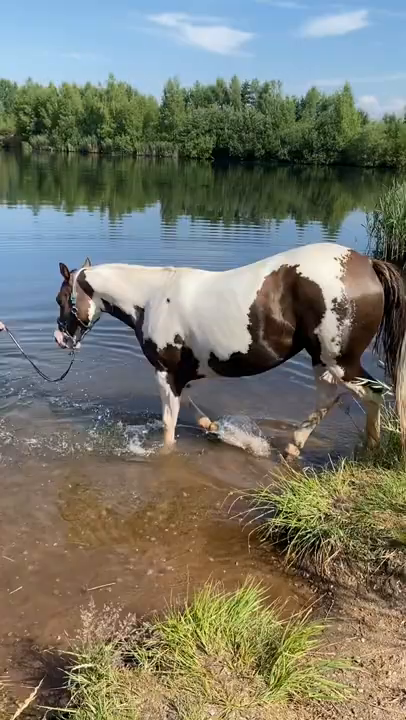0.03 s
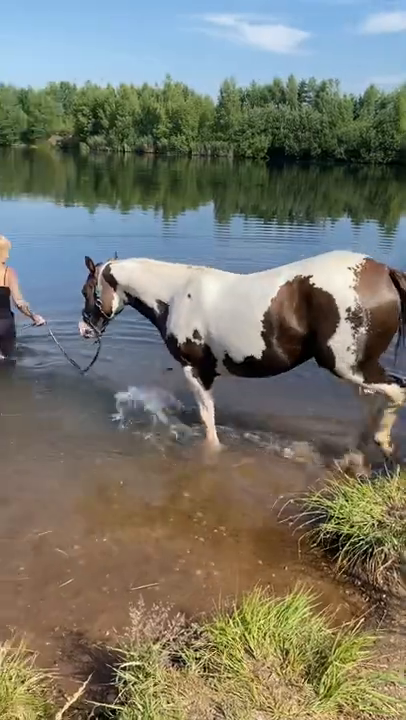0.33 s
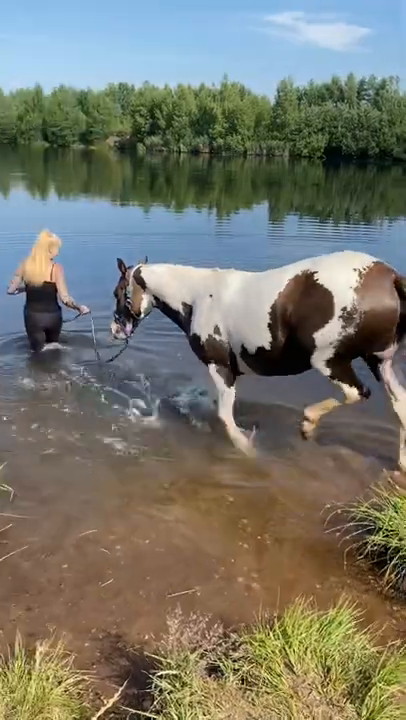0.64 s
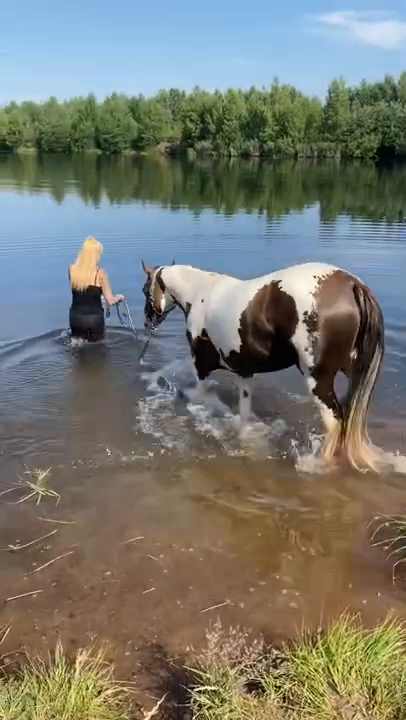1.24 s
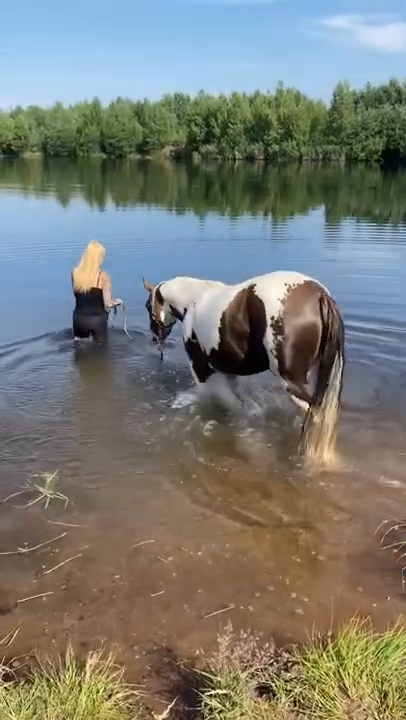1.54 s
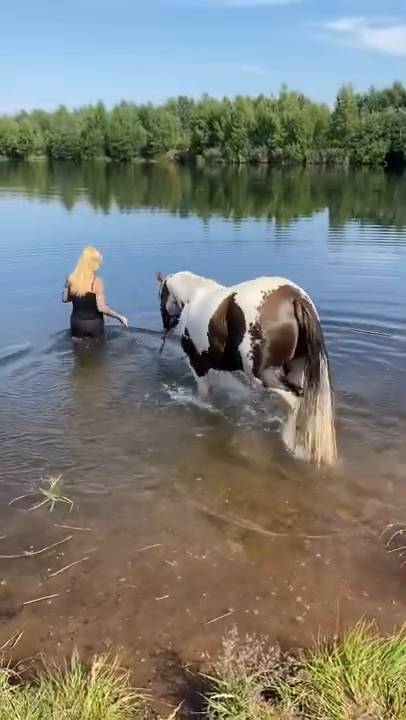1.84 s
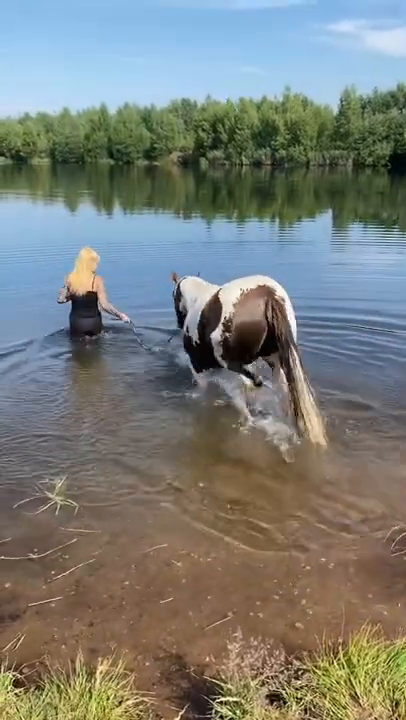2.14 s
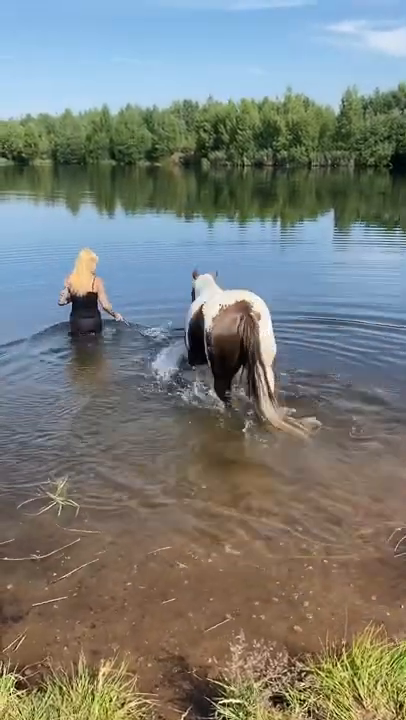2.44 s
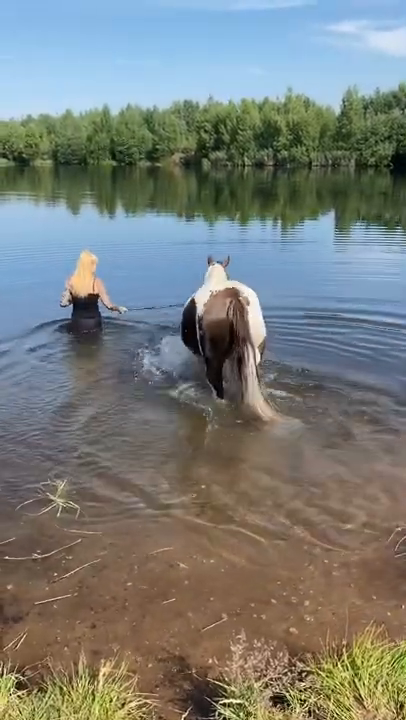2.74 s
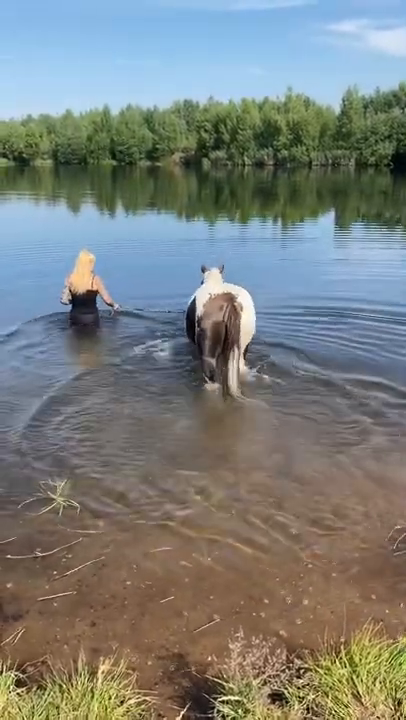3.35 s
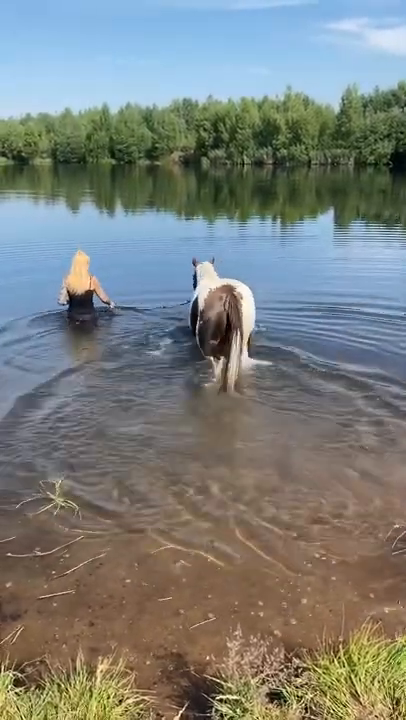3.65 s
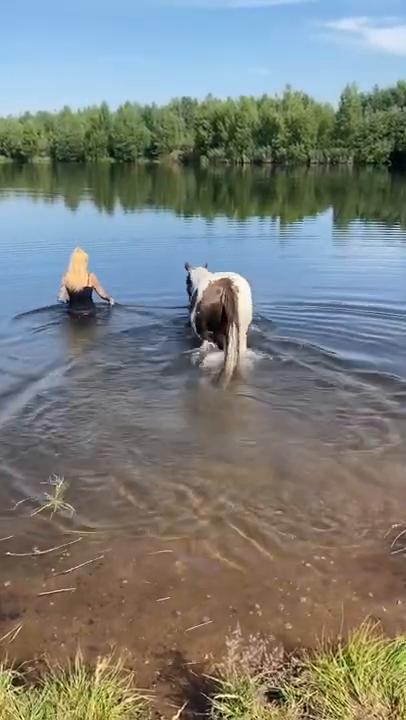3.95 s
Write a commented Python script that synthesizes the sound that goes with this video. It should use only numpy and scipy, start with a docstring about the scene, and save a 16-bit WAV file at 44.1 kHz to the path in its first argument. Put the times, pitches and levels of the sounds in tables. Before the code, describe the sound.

Irregular splashes come from a horse walking through shallow lake water a few metres from the microphone. Water churns, bubbles and drips between strides over a low rumble, growing a little quieter toward the end.

```python
"""The shore of a calm lake, a small two-port microphone a few metres from a horse wading in.
Each leg drags air under, which breaks into clouds of bubbles, now and then one big gulp; thrown water
slaps back. Between the strides the water churns, sloshes and patters over a deep rumble,
softer as the horse gets deeper and farther away."""
import sys
import numpy as np
from scipy import signal
from scipy.fft import rfft, irfft
from scipy.io import wavfile

SR = 44100
rng = np.random.default_rng(int(sys.argv[2]) if len(sys.argv) > 2 else 0)


def persist_wave(psi):
    """Save psi, clipped to +-1, as 16-bit WAV."""
    counts = np.round(np.clip(psi, -1, 1) * 32767).astype(np.int16)
    wavfile.write(sys.argv[1], SR, np.atleast_2d(counts).T)


N = 176400
TIME, HZ = np.arange(N) / SR, np.fft.rfftfreq(N, 1 / SR)
# water falling back, as spray and as drips: time_s, level_db (before each one's trim)
FALLING_WATER = [(.05, -41.5), (.35, -46), (.47, -42), (.58, -45.5), (.72, -40.5), (1.2, -40.5), (1.8, -44),
                 (1.98, -42.5), (2.16, -46), (2.28, -40.5), (2.85, -46.5), (3.23, -51.5), (3.31, -47),
                 (3.38, -58.5), (3.72, -53.5), (4.0, -49.5)]


def amp(db):
    """Decibels to gain."""
    return 10 ** (np.asarray(db) / 20)


def unit(x):
    """Scales to an rms of 1."""
    return x / np.sqrt(np.mean(x ** 2) + 1e-20)


def curve(points):
    """Joins a table's points along a log-frequency axis."""
    hz, value = np.transpose(points)
    return np.interp(np.log(HZ + 1), np.log(hz), value)


def shaped(texture, colour, level, trim_db=0):
    """Gives a steady texture its colour and its level over time."""
    coloured = unit(irfft(rfft(texture) * amp(curve(colour)), N))
    return coloured * amp(np.interp(TIME, *np.transpose(level)) + trim_db)


def add(mix, start_s, sound):
    """Mixes a sound in at a time."""
    part = mix[:, max(round(start_s * SR), 0):][:, :sound.shape[1]]
    part += sound[:, :part.shape[1]]


def bubble(hz, cycles, rise=0.0067):
    """Trapped air rings: a soft start, a climbing pitch, a decay to 1/e after `cycles` periods."""
    turns = np.arange(int(6 * cycles * SR / hz) + 2) * hz / SR
    tone = np.sin(2 * np.pi * turns * (1 + rise * turns))
    return tone * (1 - np.exp(-turns ** 2 * 2)) * np.exp(-turns / cycles)


def bubbling(low_hz, high_hz, cycles, size_db, count):
    """A steady stream of bubbles, each with its own pitch, strength, direction and ring time."""
    out = np.zeros((2, N))
    for k, (when, pitch, size, side, ring) in enumerate(rng.random((count, 5))):
        hz = low_hz + (high_hz - low_hz) * pitch ** 2
        gain = amp(size_db * min(-np.log(1 - size), 3))
        gain *= hz ** 0.46  # small bubbles make up for their short ring
        ring_cycles = cycles * 2 ** (0.92 * (2 * ring - 1))
        sound = gain * bubble(hz, ring_cycles, rise=0.0193 / cycles)
        add(out, (k + when) / count * N / SR, np.outer([1, np.sqrt(3) * (2 * side - 1)], sound))
    return out


def spray(drops_per_s=2500, drop_decay_s=0.0021, flurries_per_s=41, flurry_decay_s=0.014):
    """Drops of many sizes patter back over a fine mist, in flurries as handfuls land together."""
    # tone of the spray: frequency_hz, gain_db
    colour = [(400, 1), (1500, 5), (2800, 2.5), (3300, 0), (4700, -2.5), (5700, -1.5), (7500, -5.5),
              (10500, -4.5), (12500, -13.5)]
    hits = amp(5.5 * np.minimum(rng.exponential(1, N), 4.6)) * (rng.random(N) < drops_per_s / SR)
    kinds = rng.integers(0, 8, N)
    sides = np.array([np.ones(N), rng.standard_normal(N)])
    ticks = rng.standard_normal((8, 400)) * np.exp(-np.arange(400) / SR / drop_decay_s)
    drops = sum(signal.oaconvolve(sides * hits * (kinds == k), tick[None], axes=1)[:, :N]
                for k, tick in enumerate(ticks))
    landings = np.minimum(rng.exponential(1, N), 2) * (rng.random(N) < flurries_per_s / SR)
    flurry = signal.lfilter([1], [1, -np.exp(-1 / SR / flurry_decay_s)], landings)
    mist = amp(4) * rng.standard_normal((2, N))
    return shaped((unit(drops) + mist) * (1 + 0.4 * flurry), colour, FALLING_WATER, trim_db=2)


def rumble():
    """The moving water rumbles deep under everything."""
    # swell of the rumble: time_s, level_db
    level = [(.05, -51), (1.6, -48), (3.3, -49.5), (4.0, -56)]
    # its tone: frequency_hz, gain_db
    colour = [(25, -41), (45, -21), (60, 13), (80, 3.5), (98, 12), (120, -4), (200, -33.5)]
    return shaped(rng.standard_normal((2, N)), colour, level)


def churn():
    """Large bubbles ring low in the stirred water."""
    # surges of the churn: time_s, level_db (before the trim)
    level = [(.05, -42.5), (.15, -59.5), (.35, -69), (.45, -36.5), (.6, -76), (.75, -43), (1.05, -39.5),
             (1.38, -51), (1.6, -36), (1.8, -44), (2.15, -49.5), (2.38, -43), (2.8, -40), (3.02, -43.5),
             (3.33, -38.5), (3.42, -44.5), (3.75, -48), (4.0, -40)]
    # its tone: frequency_hz, gain_db
    colour = [(70, -39), (130, -12), (175, -1), (250, 1.5), (400, -4), (700, -59)]
    return shaped(bubbling(113.9, 455.3, cycles=3.55, size_db=4, count=600), colour, level, trim_db=-1.5)


def slosh():
    """Thousands of smaller, short-lived bubbles merge into a midrange wash."""
    # surges of the wash: time_s, level_db (before the trim)
    level = [(.06, -43.5), (.33, -47), (.58, -49), (.8, -39), (1.1, -35), (1.3, -45.5), (1.5, -33.5),
             (1.72, -38.5), (1.98, -38), (2.16, -40.5), (2.32, -41), (2.78, -36.5), (3.03, -40.5),
             (3.25, -42), (3.58, -44.5), (3.95, -40.5)]
    # its tone: frequency_hz, gain_db
    colour = [(150, -31), (280, -15), (450, 1), (1100, -1.5), (1500, -3.5), (2200, -12.5), (2800, -6),
              (3300, -17.5), (6000, -10)]
    return shaped(bubbling(246.4, 4405, cycles=2.96, size_db=0, count=8500), colour, level, trim_db=-1.5)


def drips():
    """Single drips fall with the spray and ring on."""
    # tone of the drips: frequency_hz, gain_db
    colour = [(400, -6.5), (1400, -4.5), (6000, -13)]
    rings = bubbling(479.5, 6146, cycles=9.96, size_db=0.5, count=380)
    return shaped(rings, colour, FALLING_WATER, trim_db=-3)


def plunges(count=40, spread_octaves=0.612, puff_db=-6):
    """Legs tear off bubble clouds whose pitch drifts as the cavity closes, each with a puff of spray."""
    # bubble clouds: start_s, length_s, level_db, first_pitch_hz, last_pitch_hz
    clouds = [(.074, 0.019, -33.5, 1470, 1230), (.208, .03, -38, 1270, 738), (.385, 0.08, -39, 840, 425),
              (.465, 0.017, -30, 860, 694), (.624, 0.017, -32, 1480, 1120), (.647, .015, -34, 805, 610),
              (.725, 0.031, -35, 1590, 1230), (.757, .016, -26, 1034, 860), (.772, .025, -35, 515, 543),
              (.833, 0.017, -35, 1160, 1170), (.999, 0.023, -30.5, 670, 394),
              (1.207, 0.034, -26.5, 420, 261), (1.226, 0.031, -28.5, 990, 717),
              (1.396, 0.025, -33, 1630, 920), (1.467, 0.035, -32, 447, 196),
              (1.491, .013, -26.5, 1400, 700), (1.561, .026, -27, 613, 403), (1.591, 0.052, -35, 266, 207),
              (1.87, .09, -37.5, 253, 382), (1.957, 0.034, -36.5, 716, 1010), (2.24, 0.043, -34, 514, 1100),
              (2.209, .066, -28, 417, 169), (2.284, .03, -30, 1650, 1005), (2.302, 0.038, -33, 232, 239),
              (3.135, 0.038, -35, 818, 552), (3.252, .06, -39.5, 253, 146), (3.925, 0.037, -36.5, 903, 690)]
    out = np.zeros((2, N))
    for start_s, length_s, level_db, first_hz, last_hz in clouds:
        t = np.arange(int((length_s + .08) * SR)) / SR
        cloud = np.zeros((2, len(t)))
        births = (np.arange(count) + rng.random(count)) / count
        for progress, (pitch, side) in zip(births, rng.standard_normal((count, 2))):
            centre_hz = first_hz * (last_hz / first_hz) ** progress
            hz = min(centre_hz * 2 ** (spread_octaves * max(pitch, -1.1)), SR / 4)
            add(cloud, progress * length_s * .85, np.outer([1, side], bubble(hz, cycles=3.8)))
        cloud *= np.sqrt(length_s * SR / np.sum(cloud[0] ** 2))
        hiss = signal.lfilter([.5], [1, -.6], rng.standard_normal((2, SR // 4)))[:, :len(t)]
        swell = np.minimum(t / (0.41 * length_s), 1) * np.exp(-(t / length_s) ** 2)
        add(out, start_s, amp(level_db) * (cloud + amp(puff_db) * hiss * swell))
    return out


def gulps():
    """Single large air pockets each give one quickly damped note."""
    # air pockets: start_s, pitch_hz, level_db
    pockets = [(.089, 510, -14.5), (0.08, 1520, -14.5), (.092, 1320, -16.5), (.178, 397, -26.5),
               (.231, 700, -23.5), (0.682, 430, -25), (0.719, 168, -25), (.75, 1170, -16.5),
               (.767, 395, -12.5), (.851, 910, -17.5), (.854, 77, -24), (1.231, 150, -17.5),
               (1.236, 700, -18), (1.521, 435, -16), (2.257, 283, -23.5), (2.379, 232, -24.5),
               (2.489, 197, -25), (3.078, 125, -24), (3.394, 1220, -24.5), (3.427, 211, -25),
               (3.604, 2610, -27.5), (3.719, 530, -22), (3.874, 660, -20.5), (3.904, 920, -20.5)]
    out = np.zeros((2, N))
    for start_s, pitch_hz, level_db in pockets:
        add(out, start_s, np.outer([1, 1], amp(level_db) * bubble(pitch_hz, cycles=2.24)))
    return out


def slaps(decay_s=0.003, width_octaves=0.61, samples=2048):
    """Thrown water and big drops land flat: sharp cracks of water on water."""
    # landings: start_s, level_db, centre_hz
    landings = [(.163, -25, 2230), (0.255, -38, 5500), (.468, -31, 3030), (.5394, -40, 8000),
                (0.647, -38.5, 7000), (0.713, -34.5, 5530), (0.8933, -24, 1780), (1.012, -33.5, 4940),
                (1.0782, -32, 5500), (1.1664, -42, 7500), (1.201, -31.5, 5500), (1.396, -30, 4570),
                (1.493, -29, 1390), (1.565, -30, 2430), (2.748, -37, 5400), (3.302, -30, 2680),
                (3.534, -44.5, 7000)]
    out = np.zeros((2, N))
    for start_s, level_db, centre_hz in landings:
        octaves = np.log2((np.fft.rfftfreq(samples, 1 / SR) + 1) / centre_hz)
        band = np.exp(-.5 * (octaves / width_octaves) ** 2)
        crack = irfft(rfft(rng.standard_normal((2, samples))) * band)
        crack *= np.exp(-np.arange(samples) / SR / decay_s)
        crack *= np.sqrt(decay_s * SR / 2 / np.sum(crack[0] ** 2))
        add(out, start_s, amp(level_db) * crack)
    return out


def ports(water):
    """The microphone's two ports differ in phase and level, and agree less on sound from the sides."""
    # left port ahead of the right: frequency_hz, phase_rad
    lead = [(100, 0.05), (950, 0.26), (1150, -.6), (2000, 0.1), (3100, 1.45), (4100, 1.3), (4750, 2.17),
            (5250, 6.2), (6700, 7.4), (10000, 8.3), (12000, 9.39)]
    # left port over the right: frequency_hz, gain_db
    balance = [(80, 0), (350, 0.9), (700, 6.5), (1080, 9.5), (1300, 4), (1900, 0.5), (2800, -1),
               (4000, 4.5), (4900, 0)]
    # agreement of the ports: frequency_hz, likeness (0 to 1)
    likeness = [(300, 1), (1800, 1), (2900, 0.43), (3900, 0.53), (5400, 0.98), (8000, 0.8), (11000, 0.67),
                (12500, 1)]
    alike, left_gain = np.clip(curve(likeness), 0, 1), amp(curve(balance))
    centre, spread = rfft(water)
    centre *= np.sqrt((1 + alike) / 2)
    spread *= np.sqrt((1 - alike) / 2)
    left = (centre + spread) * left_gain
    right = (centre - spread) * np.exp(-1j * curve(lead))
    return irfft(np.array([left, right]) * np.sqrt(2 / (1 + left_gain ** 2)), N)


def scene():
    """All the water at the microphone. Each source has two rows: on axis, and spread to the sides."""
    return ports(spray() + rumble() + churn() + slosh() + drips() + plunges() + gulps() + slaps())


def record(dry):
    """The microphone opens a moment in and loses the highest treble."""
    open_s, edge_hz = .034, 15750
    lowpass = signal.firwin(511, edge_hz, window=("kaiser", 9), fs=SR)
    return signal.oaconvolve(dry * (TIME > open_s), lowpass[None], "same")


dry = scene()
out = record(dry)
persist_wave(out)
```